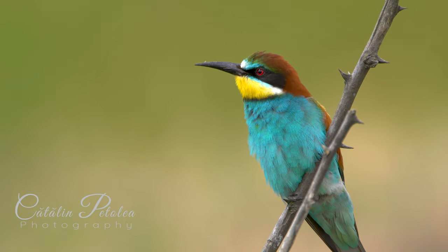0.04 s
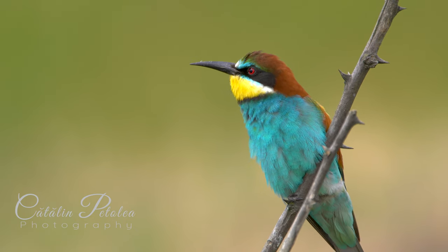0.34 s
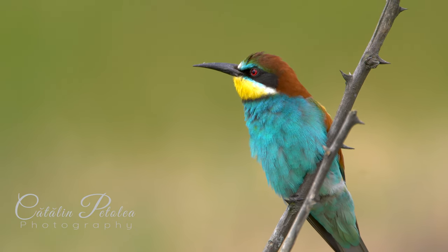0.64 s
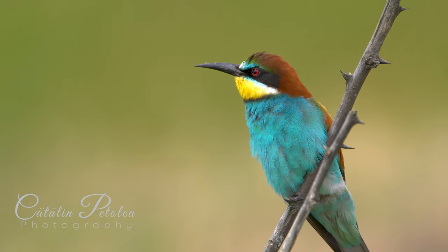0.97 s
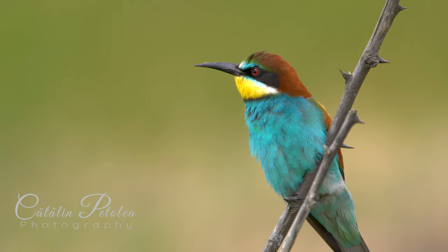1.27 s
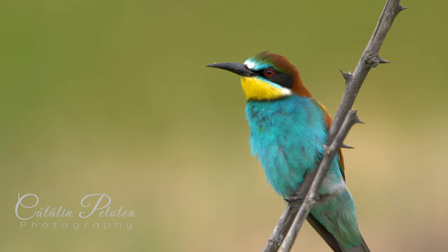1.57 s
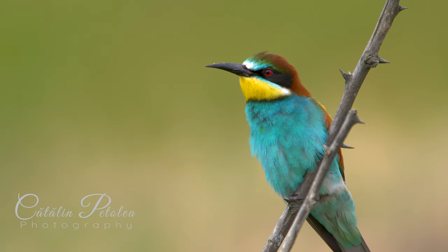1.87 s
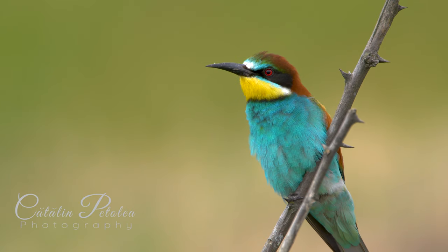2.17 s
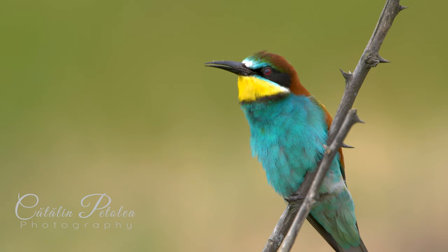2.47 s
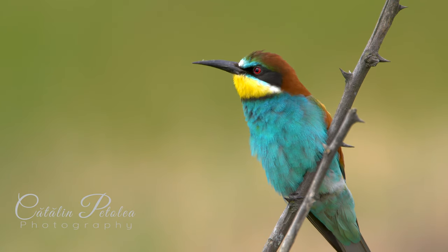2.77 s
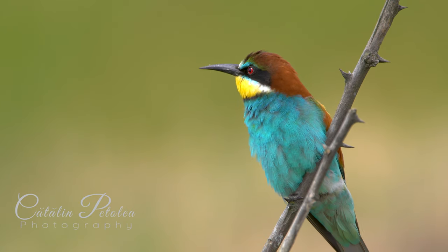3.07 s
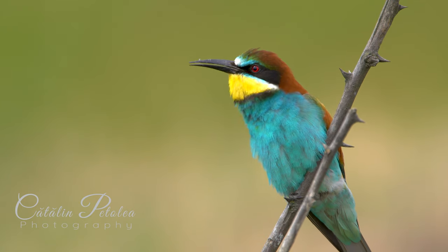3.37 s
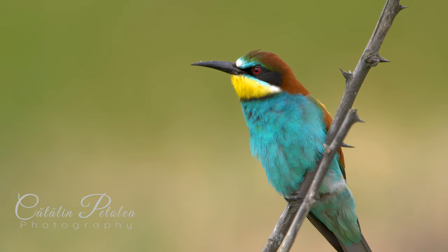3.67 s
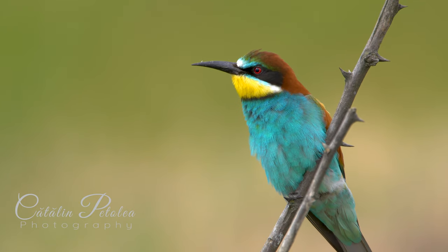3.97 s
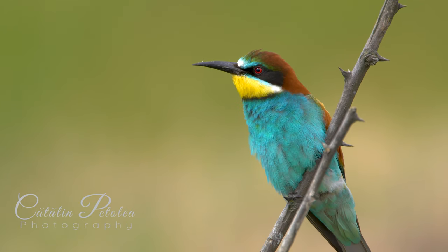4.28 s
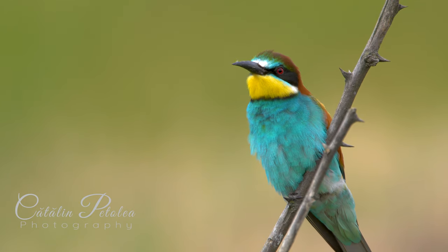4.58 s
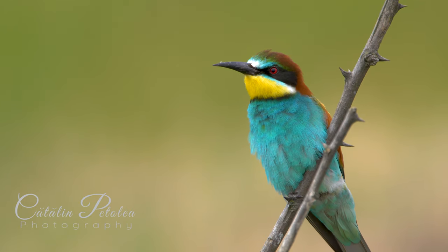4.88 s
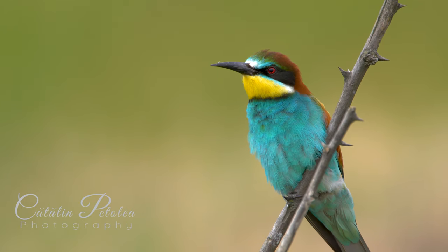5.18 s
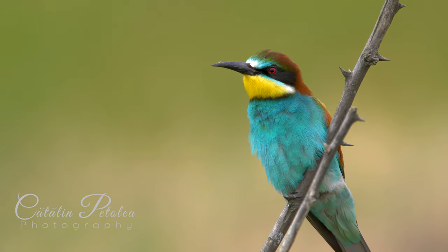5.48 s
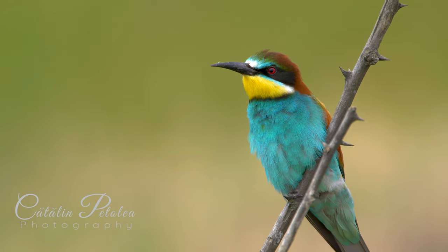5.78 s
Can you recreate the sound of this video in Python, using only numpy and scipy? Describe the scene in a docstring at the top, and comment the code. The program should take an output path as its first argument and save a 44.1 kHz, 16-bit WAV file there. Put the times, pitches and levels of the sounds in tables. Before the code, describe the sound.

Soft, liquid bird notes come in small clusters over low wind rumbling on the microphone, while sparrows chirp in the distance.

```python
"""From the start, light wind rumbles and its eddies thump on the microphone, over the hush of open
country, faint microphone hiss and the thin buzz of an insect's wings. Sparrows chirp in distant bushes,
and a perched bee-eater gives the first of three clusters of soft, liquid notes, each a pitch glide of
the syrinx. A neighbour answers with rolled calls. From about halfway a finch wheezes and a far flock
joins in, heard as sound scattered by trees and ground."""
import sys
import numpy as np
from scipy import signal
from scipy.fft import rfft, irfft, next_fast_len
from scipy.io import wavfile
from scipy.ndimage import uniform_filter1d, map_coordinates

SR = 44100
rng = np.random.default_rng(int(sys.argv[2]) if len(sys.argv) > 2 else 0)


def persist_wave(psi):
    """Save psi, clipped to +-1, as 16-bit WAV."""
    counts = np.round(np.clip(psi, -1, 1) * 32767).astype(np.int16)
    wavfile.write(sys.argv[1], SR, np.atleast_2d(counts).T)


N = 257544


def amp(db):
    """The decibel scale: a level as an amplitude ratio."""
    return 10 ** (np.asarray(db) / 20)


def unit(x):
    """Normalisation to an rms of 1."""
    return x / np.sqrt(np.mean(x ** 2) + 1e-20)


def along(points, hz):
    """Interpolation of (frequency [Hz], value) points on a logarithmic frequency axis."""
    knots_hz, values = np.transpose(points)
    return np.interp(np.log(hz + 1), np.log(knots_hz + 1), values)


def wobble(rate, size=N):
    """Random modulation: a smooth curve through `rate` Gaussian knots a second."""
    knots = rng.standard_normal(int(size * rate / SR) + 4)
    return map_coordinates(knots, [np.arange(size) * rate / SR])


def filtered(x, response):
    """Linear filtering: the spectrum of x times a complex frequency response."""
    size = next_fast_len(N + SR // 2)
    return irfft(rfft(x, size) * response(np.fft.rfftfreq(size, 1 / SR)), size)[..., :N]


def noise(spectrum):
    """Spectral shaping of white noise, scaled to an rms of 1."""
    return unit(filtered(rng.standard_normal(N), lambda hz: amp(along(spectrum, hz))))


def add(track, time_s, sound):
    """Superposition of a sound on a track."""
    start = max(round(time_s * SR), 0)
    track[start:start + len(sound)] += sound[:N - start]


def placed(x, pan_db, lead_ms):
    """Interaural level and time differences: the left ear is louder by pan_db, earlier by lead_ms."""
    ears = np.array([[.5], [-.5]])
    return amp(ears * pan_db) * filtered(x, lambda hz: np.exp(2j * np.pi * hz * ears * lead_ms / 1000))


def eddy(hz, cycles):
    """A passing vortex: a brief pressure swing of random phase, centred in its span."""
    periods = np.arange(-4 * cycles, 4 * cycles, hz / SR)
    envelope = np.hanning(len(periods)) / np.cosh(periods / cycles)
    return envelope * np.cos(2 * np.pi * (periods + rng.random()))


def small_eddies(strength, per_s=4.6, middle_hz=100):
    """Intermittency: weak thumps at random moments, scaled by the wind's strength at the time."""
    track = np.zeros(N)
    for when, size, pitch in rng.random((int(per_s * N / SR), 3)):
        swing = eddy(middle_hz * 2 ** (pitch - .5), cycles=.6)
        add(track, when * N / SR, strength[int(when * N)] * amp(12 * size - 4.5) * swing)
    return track


# course of the wind's strength: (time [s], level [dB])
WIND_STRENGTH = [(0.0, -39.5), (0.11, -41), (0.42, -47), (0.68, -56.5), (0.85, -46), (1.3, -52.5),
                 (1.69, -44), (1.84, -38.5), (1.97, -36.5), (2.11, -36.5), (2.55, -43), (3.03, -41),
                 (3.15, -44.5), (3.87, -46.5), (4.26, -42), (4.52, -47), (5.37, -37), (5.84, -41)]
# spectra of the rumble and of small-scale turbulence: (frequency [Hz], relative density [dB])
RUMBLE_SPECTRUM = [(12, -51), (22, -6), (55, 3.5), (90, 1.5), (130, -5.5), (190, -13), (280, -33.5),
                   (450, -52.5), (900, -87)]
TURBULENCE_SPECTRUM = [(70, -25), (125, 5), (175, 1.5), (260, -8.5), (350, -15.5), (520, -22), (1000, -54),
                       (2000, -100)]
# strong eddies: (time [s], thump level [dB], thump frequency [Hz], whirl level [dB])
STRONG_EDDIES = [(.018, -23, 90, -37), (0.227, -21, 85, -28), (.414, -26, 77.6, -42), (0.74, -35, 101, -36),
                 (0.963, -23, 80.7, -38), (1.0, -29.5, 74, -42), (1.615, -31.5, 88.8, -28),
                 (1.649, -24, 112.6, -34.5), (1.825, -32, 83, -22.5), (1.879, -25, 102, -20),
                 (2.015, -16.5, 84, -20), (2.092, -25, 82, -26), (2.283, -15, 75, -22),
                 (2.309, -23.5, 75.5, -22), (2.343, -25, 68, -37), (2.626, -36.5, 75.4, -33),
                 (2.794, -25, 85, -40), (2.881, -31.5, 130, -35), (2.993, -24, 108, -36),
                 (3.01, -22.5, 110, -31), (3.157, -25.5, 71, -43), (3.763, -25, 67.8, -44),
                 (4.149, -24, 78, -30), (4.923, -23, 76, -38), (5.203, -30, 103, -27),
                 (5.282, -21.5, 108, -31), (5.378, -21, 88, -20.5), (5.407, -18.5, 89, -28.5),
                 (5.472, -19, 89, -41), (5.516, -19, 71, -32.5), (5.596, -24, 98, -18.5),
                 (5.692, -19, 88, -23.5)]
# the air reaches the right microphone port first: (frequency [Hz], phase lead [rad])
PORT_PHASE = [(30, 0.2), (65, 0.22), (100, 0.55), (200, 0.99), (290, 1.94), (450, 0.7)]


def wind(apart_db=-8, whirl_hz=195, gust_db=-36, growth=1.8, unrest_db=3):
    """Turbulent pressure at the microphone: a gusty rumble, and thumping eddies that each shed a whirl."""
    strength_db = np.interp(np.arange(N) / SR, *np.transpose(WIND_STRENGTH)) + 2
    level_db = strength_db + unrest_db * wobble(25)
    level = amp(level_db)
    # small-scale turbulence grows faster than the rumble, so gusts sound brighter
    churn = amp(-45 + growth * (level_db - gust_db) + 3.26 * wobble(40)) * noise(TURBULENCE_SPECTRUM)
    coherent = level * noise(RUMBLE_SPECTRUM) + churn
    incoherent = amp(apart_db) * level * np.array([noise(RUMBLE_SPECTRUM), noise(RUMBLE_SPECTRUM)])
    for time_s, thump_db, thump_hz, whirl_db in STRONG_EDDIES:
        thump = amp(thump_db) * eddy(thump_hz, cycles=.47)
        whirl = amp(whirl_db) * eddy(whirl_hz, cycles=.37)
        for swing in (thump, whirl):
            add(coherent, time_s - len(swing) / SR / 2, swing)
    coherent += small_eddies(amp(strength_db))
    at_ports = filtered(coherent, lambda hz: np.exp(.5j * np.outer([-1, 1], along(PORT_PHASE, hz))))
    return at_ports + incoherent


# the hush of far-off air, with microphone hiss in the treble: (frequency [Hz], relative density [dB])
HUSH_SPECTRUM = [(40, -12), (100, -1), (200, -12), (320, -8.5), (600, -11.5), (1000, -14), (1400, -19),
                 (1900, -19), (2600, -22), (4300, -22), (6200, -29), (8000, -31.5), (15500, -35)]
# the part arriving from the left: (frequency [Hz], share of power [ratio])
LEFT_SHARE = [(100, 1), (300, 0.99), (1000, 0.28), (3000, 0.59), (5500, 0.42), (7500, 0.018)]
# level difference between the channels: (frequency [Hz], left minus right [dB])
HUSH_BALANCE = [(100, 2), (250, 2), (650, 5.5), (1300, 7.5), (2400, 1.5), (4400, -1), (9000, -0.5)]


def hush(db=-52):
    """Partial coherence: steady far-off air, partly from the left, with faint treble microphone hiss."""
    from_left = placed(noise(HUSH_SPECTRUM), pan_db=0, lead_ms=.14)
    uncorrelated = np.array([noise(HUSH_SPECTRUM), noise(HUSH_SPECTRUM)])
    pair = filtered(from_left, lambda hz: np.sqrt(along(LEFT_SHARE, hz)))
    pair += filtered(uncorrelated, lambda hz: np.sqrt(1 - along(LEFT_SHARE, hz)))
    return amp(db) * filtered(pair, lambda hz: amp(np.outer([1, -1], along(HUSH_BALANCE, hz)) / 2))


def insect(centre_hz=6960, width_hz=120, stroke_hz=55, db=-77, waver_db=2.5):
    """Amplitude modulation: wing strokes pulse a narrow resonance, and the buzz slowly wavers."""
    excitation = rng.standard_normal((2, N))
    ring = unit(filtered(excitation, lambda hz: 1 / (1 + ((hz - centre_hz) / width_hz) ** 2)))
    rate_hz = stroke_hz * (1 + .012 * wobble(1))
    strokes = 1 + .75 * np.sin(2 * np.pi * np.cumsum(rate_hz) / SR)
    return amp(db + waver_db * wobble(2.06)) * unit(strokes) * ring


def arch(time_s, length_s, open_hz, crest_hz, close_hz, db, fade_db_per_hz=0, flatness=2.2):
    """Frequency modulation about a crest: one note's contour as (time [s], pitch [Hz], level [dB])."""
    t = np.arange(0, length_s, 1 / SR)
    before, after = (np.abs([open_hz - crest_hz, close_hz - crest_hz]) + 1) ** (1 / flatness)
    from_crest = (before + after) * t / length_s - before
    direction = np.sign(np.where(from_crest < 0, open_hz, close_hz) - crest_hz)
    bend_hz = direction * np.abs(from_crest) ** flatness
    attack_s, release_s, edge_db = .0033, .0081, 8.5
    closure = 1 - np.clip(np.minimum(t / attack_s, (length_s - t) / release_s), 0, 1)
    level_db = db - fade_db_per_hz * np.abs(bend_hz) - edge_db * closure ** 2
    return np.transpose([time_s + t, crest_hz + bend_hz, level_db])


def phrase(syllables, pause_db=-22):
    """Articulation: arched syllables joined in one contour, the level dropping between them."""
    contours = [arch(*syllable) for syllable in syllables]
    for contour in contours:
        contour[[0, -1], -1] = pause_db
    return np.vstack(contours)


def gesture(contour, glide_s=.0024):
    """Inertia of the syrinx: a contour rounded into smooth pitch and amplitude curves."""
    times, hz, db = np.transpose(contour)
    times = np.maximum.accumulate(times)
    t = np.arange(times[0], times[-1] + glide_s / 2, 1 / SR)
    edges = np.sin(np.pi / 2 * np.clip(np.minimum(t - t[0], t[-1] - t) / glide_s, 0, 1))
    targets = [np.interp(t, times, hz), np.interp(t, times, db)]
    pitch, level_db = uniform_filter1d(targets, int(glide_s * SR), axis=1)
    return pitch, np.sqrt(2) * amp(level_db) * edges


# transmission of overtones through the beak: (frequency [Hz], gain [dB])
BEAK_RESPONSE = [(2700, 0), (3100, -15), (3500, -29.5), (4600, -47), (5500, -34), (7200, -45), (11000, -37),
                 (12500, -51), (14300, -31), (15500, -54)]


def whistle(pitch, overtone_db, harmonics):
    """Source and filter: a nearly pure tone whose overtones escape the beak best at low pitch."""
    phase = 2 * np.pi * np.cumsum(pitch) / SR
    overtones = sum(amp(along(BEAK_RESPONSE, k * pitch)) * np.sin(k * phase)
                    for k in range(2, harmonics + 1))
    return np.sin(phase) + amp(overtone_db) * overtones


def calls(contour, events, jitter, flutter_db, overtone_db):
    """Time and frequency scaling: one contour repeated, each time at its own level, pitch and pace."""
    track = np.zeros(N)
    for time_s, db, pitch_ratio, stretch in events:
        pitch, envelope = gesture(np.array(contour) * [stretch, pitch_ratio, 1])
        pitch = pitch * (1 + jitter * wobble(700, len(pitch)))
        envelope = envelope * amp(db + flutter_db * wobble(197.7, len(pitch)))
        add(track, time_s + stretch * contour[0][0], envelope * whistle(pitch, overtone_db, harmonics=3))
    return track


# syllables of a chirrup and of the lower, hoarser cheep:
# (time from onset [s], length [s], opening pitch [Hz], crest [Hz], closing pitch [Hz], level [dB])
CHIRRUP_SYLLABLES = [(0, .022, 4100, 5230, 4200, 3), (.035, 0.024, 4100, 4760, 4610, 1.5),
                     (0.073, .026, 3750, 4330, 4280, -4.5)]
CHEEP_SYLLABLES = [(0, .025, 4880, 5250, 3906, -5), (.028, .025, 3890, 4400, 3700, 0),
                   (.057, .026, 3800, 4350, 4100, -0.5), (.09, .022, 3634, 4350, 3900, -1.5)]
# a short contact note: (time from onset [s], pitch [Hz], level [dB])
PIP_CONTOUR = [(0, 4315, -19), (.012, 4104, -3), (.035, 4000, -27.5)]
# when each call sounds: (time [s], gain [dB], pitch [ratio], length [ratio])
CHIRRUP_EVENTS = [(.1, -62.5, 1.04, 1.2), (.813, -52, 0.99, 0.94), (1.045, -57.5, 1.08, 0.8),
                  (1.226, -54, 1.03, 0.99), (1.565, -64, 1.05, 0.89), (3.035, -61.5, 1.02, .7),
                  (3.944, -51.5, 1.017, 0.92), (4.485, -59, 1.02, 0.97)]
CHEEP_EVENTS = [(.443, -50, 1, 1), (1.676, -53.5, 0.98, 1), (2.775, -60.5, 1.07, .8),
                (3.555, -52, .99, 0.99), (4.935, -54, 1, 0.88), (5.535, -52.5, .99, 1)]
PIP_EVENTS = [(2.205, -54, 1, 1.25), (2.26, -55.5, 0.98, 0.86), (4.616, -57, 1.3, 0.83),
              (4.656, -64, 1.28, 0.77), (5.27, -59.5, 1.04, 1.2), (5.37, -60, 1.25, 2.17),
              (5.486, -57, 0.66, 1.5), (5.54, -48, 0.92, 1)]


def sparrows():
    """Rapid frequency sweeps of the syrinx: chirrups, cheeps and short contact notes."""
    chirrups = calls(phrase(CHIRRUP_SYLLABLES), CHIRRUP_EVENTS, jitter=.012, flutter_db=2, overtone_db=-6)
    cheeps = calls(phrase(CHEEP_SYLLABLES), CHEEP_EVENTS, jitter=.04, flutter_db=2.5, overtone_db=-6)
    pips = calls(PIP_CONTOUR, PIP_EVENTS, jitter=.017, flutter_db=3.5, overtone_db=-3)
    return chirrups + cheeps + pips


# the perched bird's notes:
# (time [s], length [s], opening pitch [Hz], crest [Hz], closing pitch [Hz], level [dB])
LIQUID_NOTES = [(0.222, 0.048, 1456, 1792, 1560, -33), (.278, .016, 1576, 1470, 1520, -46),
                (.3105, 0.028, 1730, 1840, 1730, -31), (0.382, .029, 1500, 1563, 1390, -42.5),
                (0.697, 0.021, 1700, 2006, 1920, -42.5), (2.559, 0.038, 1416, 1770, 1685, -32.5),
                (2.619, 0.014, 1540, 1477, 1530, -44.5), (2.65, 0.033, 1730, 1856, 1710, -28),
                (2.714, 0.039, 1505, 1563, 1350, -42.5), (3.372, 0.018, 1850, 1840, 1820, -31.5),
                (3.393, 0.034, 1780, 1785, 1568, -32.5), (3.419, 0.04, 1618, 1530, 1523, -42),
                (3.47, .041, 1735, 1810, 1310, -32)]


def perched_bee_eater(jitter=.005, shimmer_db=.5, firm_db=-29, weak_db=-50):
    """Coupled pitch and amplitude: each arched note weakens as it bends away from its crest."""
    track = np.zeros(N)
    for note in LIQUID_NOTES:
        pitch, envelope = gesture(arch(*note, fade_db_per_hz=.036))
        unsteady = np.sqrt(amp(firm_db) / np.maximum(envelope, amp(weak_db)))  # a weak voice wavers more
        pitch = pitch * (1 + jitter * unsteady * wobble(530, len(pitch)))
        envelope = envelope * amp(shimmer_db * unsteady * wobble(410, len(pitch)))
        add(track, note[0], envelope * whistle(pitch, overtone_db=-3.5, harmonics=8))
    return track


# a small bird's harsh falling call: (time from onset [s], pitch [Hz], level [dB])
HARSH_CONTOUR = [(0, 3700, -12), (.016, 4950, 0.5), (.03, 4300, 0), (.044, 3500, 0.5), (.06, 3200, -7),
                 (.075, 3000, -6), (.095, 2650, -9)]
# when it sounds: (time [s], gain [dB], pitch [ratio], length [ratio])
HARSH_EVENTS = [(.333, -50, 0.97, 0.82), (.595, -50, 0.98, 1), (1.885, -58, 1.02, 0.63),
                (1.936, -58, 0.93, 0.95), (1.984, -56, 1.1, .7), (2.036, -55.5, 1.1, .8),
                (3.489, -56, .97, .7), (5.491, -57.5, 1.04, 0.88)]


def harsh_calls():
    """Spectral broadening: strong pitch jitter turns a falling tone into a rasp."""
    return calls(HARSH_CONTOUR, HARSH_EVENTS, jitter=.07, flutter_db=2.5, overtone_db=-6)


# upward flicks of the voice in a rolled call: (time from onset [s], length [s], jump [Hz])
ROLL_FLICKS = [(.043, 0.01187, 386), (0.07, .024, 426.5)]


def roll(length_s=.095, start_hz=1537, rise_hz_per_s=2900, crest_s=.055, crest_db=1.5):
    """A linear sweep with two upward flicks: the rolled call's contour, swelling and then fading."""
    t = np.arange(0, length_s, 1 / SR)
    flicks = sum(jump_hz * np.exp(-(2 * (t - time_s) / width_s) ** 4)
                 for time_s, width_s, jump_hz in ROLL_FLICKS)
    swell_db_per_s, fade_db_per_s = 239, 155
    level_db = crest_db + np.minimum(swell_db_per_s * (t - crest_s), fade_db_per_s * (crest_s - t))
    return np.transpose([t, start_hz + rise_hz_per_s * t + flicks, level_db])


# the neighbour's rolled calls: (time [s], gain [dB], pitch [ratio], length [ratio])
NEIGHBOUR_ROLLS = [(.471, -57, 1.11, 0.94), (0.816, -58, .99, 0.97), (1.235, -46, .99, 0.98),
                   (1.669, -45, 1.03, 0.89), (2.033, -42.5, 1, 1), (2.366, -43, 1.03, 1),
                   (2.657, -47.5, 1.02, 0.95)]


def neighbour_bee_eater():
    """Nearly periodic vibration of the syrinx: rolled calls with little jitter sound clear."""
    return calls(roll(), NEIGHBOUR_ROLLS, jitter=.008, flutter_db=1.4, overtone_db=-2)


# the finch's falling wheeze: (time from onset [s], pitch [Hz], level [dB])
WHEEZE_CONTOUR = [(0, 4800, -10), (.12, 4300, -8), (.2, 4000, -2), (.28, 3824, -2), (.36, 3700, -6.5),
                  (.46, 3470, -22)]
# when it sounds: (time [s], gain [dB], pitch [ratio], length [ratio])
WHEEZE_EVENTS = [(2.72, -64.5, 1, .51), (3.16, -59.5, 1.05, .55), (4.75, -54, 1, 0.99)]


def finch(trill_hz=72, depth=.7):
    """Amplitude modulation: a fast trill gives a falling wheeze its buzz."""
    trill = 1 + depth * np.sin(2 * np.pi * trill_hz * np.arange(N) / SR)
    return trill * calls(WHEEZE_CONTOUR, WHEEZE_EVENTS, jitter=.055, flutter_db=2, overtone_db=-10)


# the far flock's rolled calls: (time [s], gain [dB], pitch [ratio], length [ratio])
FLOCK_ROLLS = [(2.781, -58.5, 0.93, 0.99), (3.029, -69, 0.8, 1.2), (3.231, -58.5, 0.93, 1.46),
               (3.56, -58.5, 0.98, 1.27), (3.661, -64, .86, 1.3), (4.03, -59, .96, 1.1),
               (4.28, -62.5, .92, 1.46), (4.4, -62, .92, 1.2), (4.629, -62, .88, 1.3),
               (5.05, -63.5, .93, 1.3), (5.34, -62, 0.97, 1.3), (5.48, -66, 0.98, 1.3),
               (5.6, -59.5, .98, 1.35)]


def far_flock():
    """Random frequency modulation blurs the faint rolled calls of far bee-eaters."""
    return calls(roll(), FLOCK_ROLLS, jitter=.04, flutter_db=2, overtone_db=-10)


# decay of sound among the trees: (frequency [Hz], reverberation time [s])
TREE_DECAY = [(500, 1), (2000, 0.26), (5000, 0.28), (12000, 0.056)]


def echo(x):
    """Diffuse scattering by trees and ground: convolution with a different noise tail in each ear."""
    hz, t, spectrogram = signal.stft(rng.standard_normal((2, SR)), SR, nperseg=256)
    decay_db = -60 * t / along(TREE_DECAY, hz)[:, None]
    tail = signal.istft(spectrogram * amp(decay_db), SR, nperseg=256)[1]
    return signal.fftconvolve(x[None], tail / np.linalg.norm(tail[0]), axes=1)[:, :N]


def small_birds():
    """Direct and scattered sound from two places in the bushes: hoarse voices blurred by distance."""
    chirps = sparrows()
    rasps = harsh_calls() + finch()
    hoarse = 1 + .3 * wobble(2200)  # the two sides of the syrinx beat irregularly
    chirps, rasps = hoarse * chirps, hoarse * rasps
    direct = amp(-2) * placed(chirps, pan_db=-7, lead_ms=.07)
    direct += amp(.5) * placed(rasps, pan_db=-.5, lead_ms=.12)
    return direct + amp(-8.5) * echo(chirps) + amp(-5.5) * echo(rasps)


def bee_eaters():
    """The direct-to-reverberant ratio falls with distance: the near bird almost dry, the flock all echo."""
    near, neighbour, flock = perched_bee_eater(), neighbour_bee_eater(), far_flock()
    direct = placed(near, pan_db=1.5, lead_ms=.026) + placed(neighbour, pan_db=1.5, lead_ms=-.005)
    distant = amp(-7) * placed(echo(flock)[0], pan_db=1, lead_ms=.02)
    scattered = amp(-27) * near + amp(-12) * neighbour + amp(-8) * flock
    return direct + distant + echo(scattered)


def scene():
    """Superposition of independent sources in the open air."""
    return wind() + hush() + insect() + small_birds() + bee_eaters()


def record(dry, top_hz=15750):
    """Band limiting: an ideal low-pass filter passes nothing above top_hz."""
    return filtered(dry, lambda hz: hz < top_hz)


dry = scene()
out = record(dry)
persist_wave(out)
```